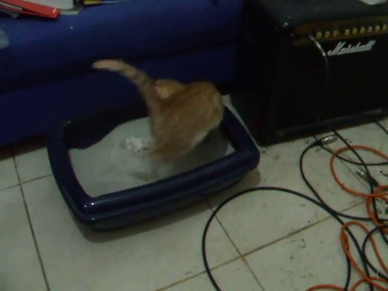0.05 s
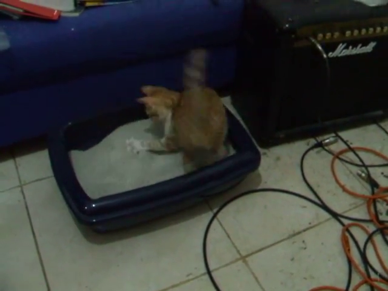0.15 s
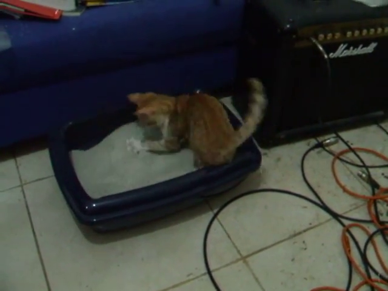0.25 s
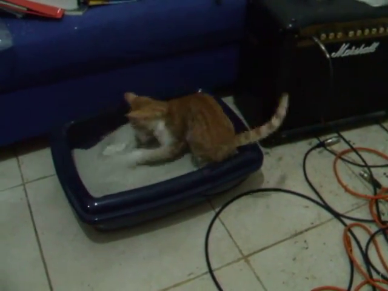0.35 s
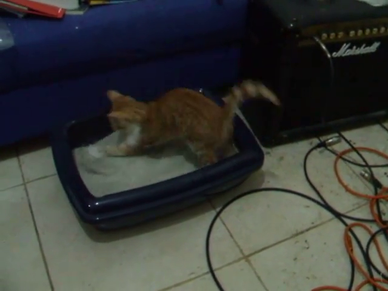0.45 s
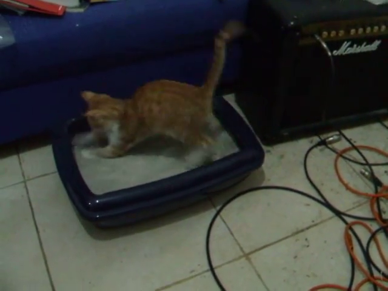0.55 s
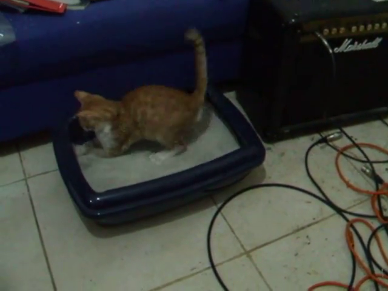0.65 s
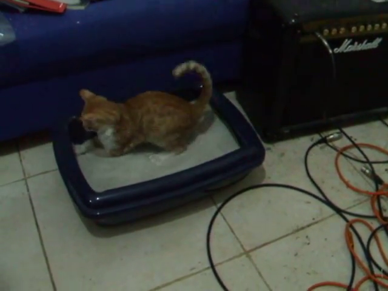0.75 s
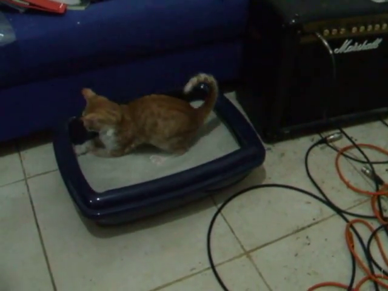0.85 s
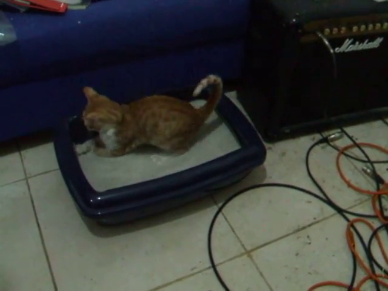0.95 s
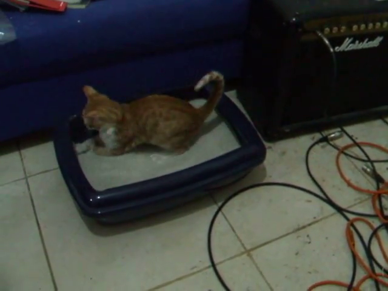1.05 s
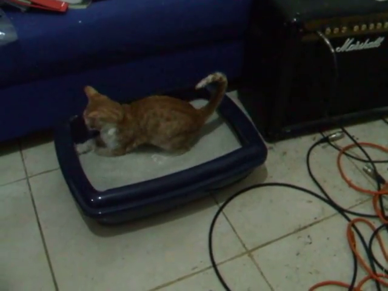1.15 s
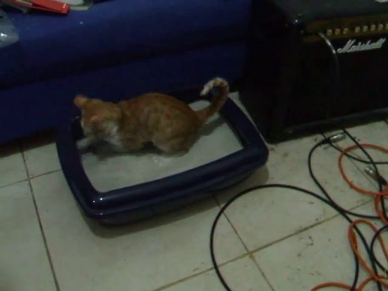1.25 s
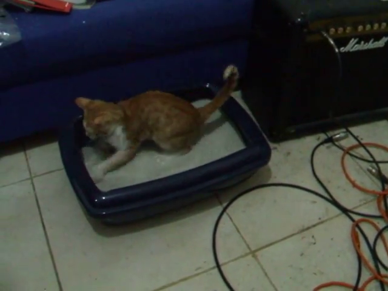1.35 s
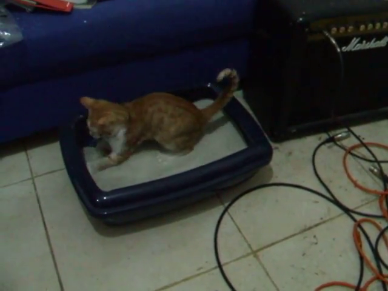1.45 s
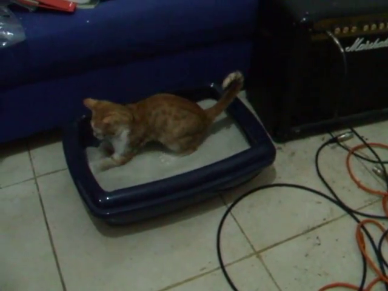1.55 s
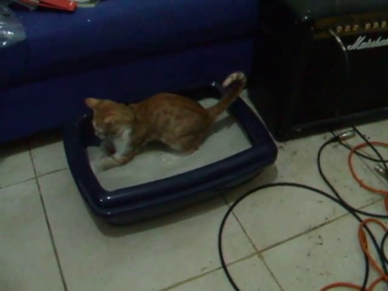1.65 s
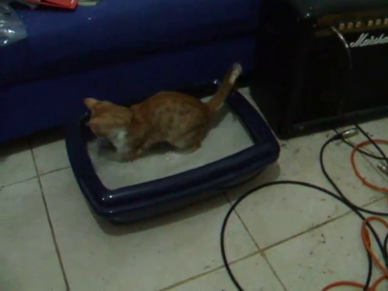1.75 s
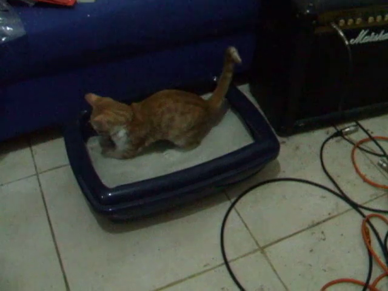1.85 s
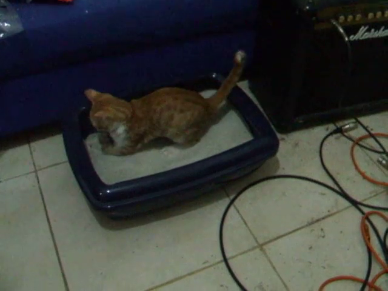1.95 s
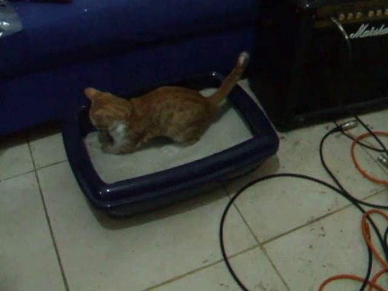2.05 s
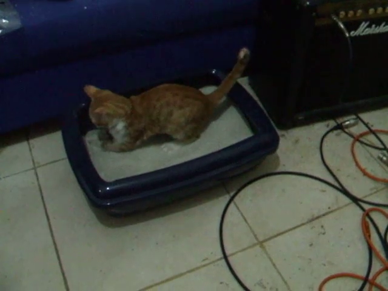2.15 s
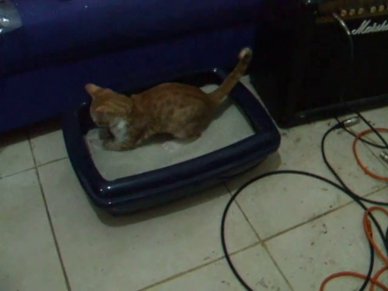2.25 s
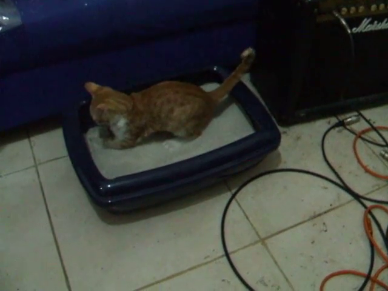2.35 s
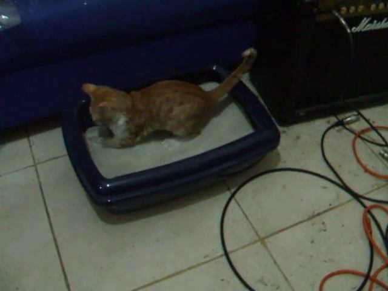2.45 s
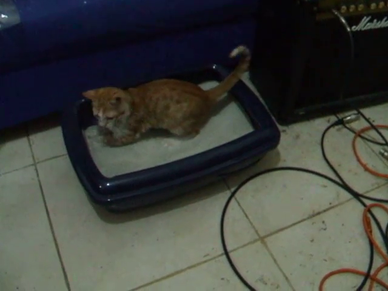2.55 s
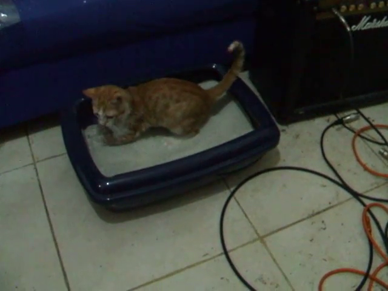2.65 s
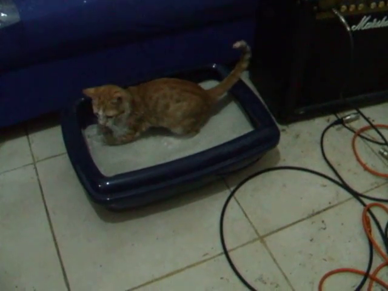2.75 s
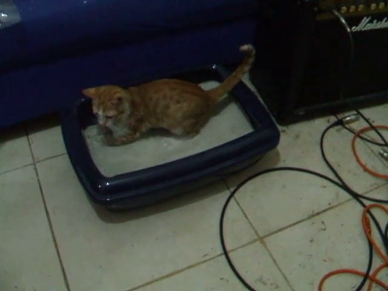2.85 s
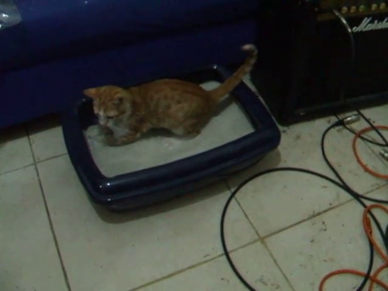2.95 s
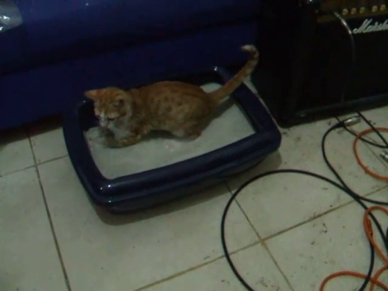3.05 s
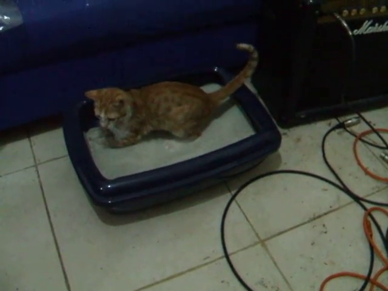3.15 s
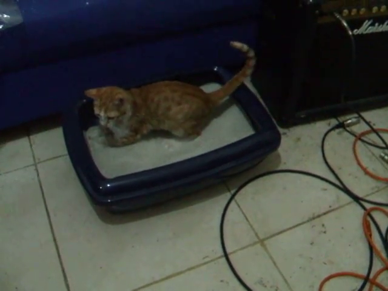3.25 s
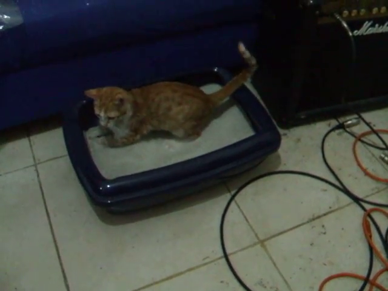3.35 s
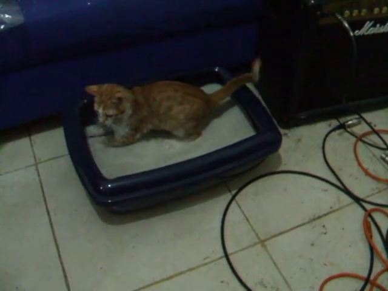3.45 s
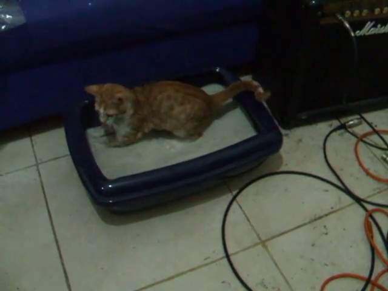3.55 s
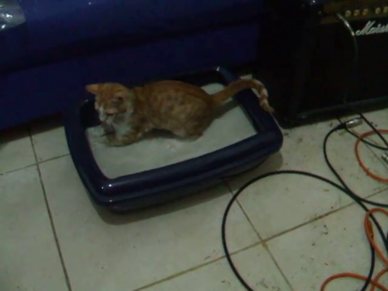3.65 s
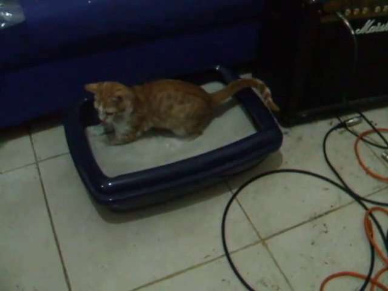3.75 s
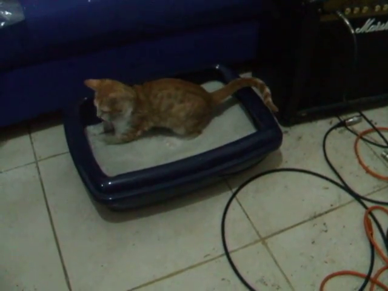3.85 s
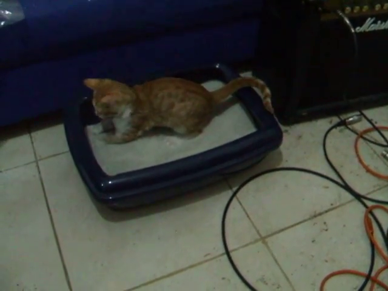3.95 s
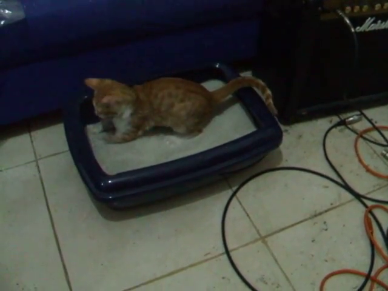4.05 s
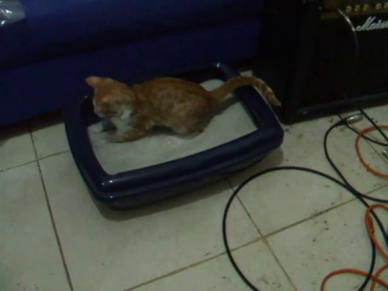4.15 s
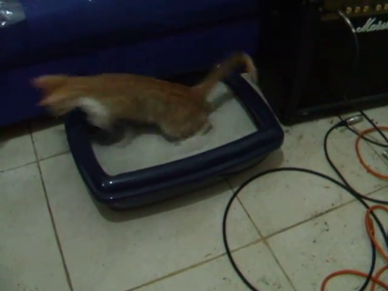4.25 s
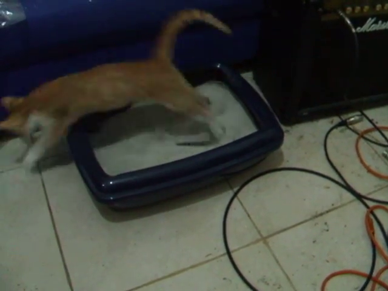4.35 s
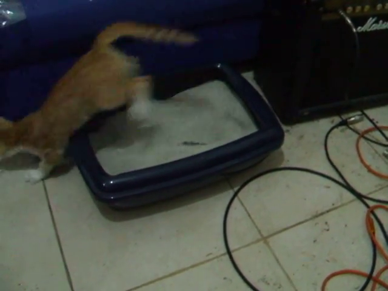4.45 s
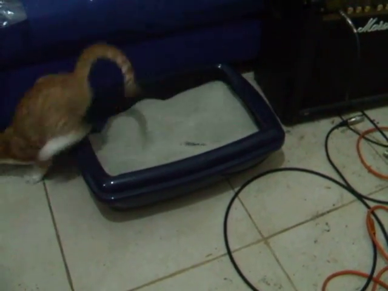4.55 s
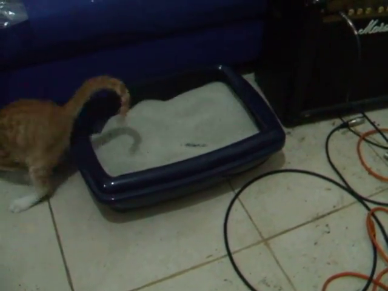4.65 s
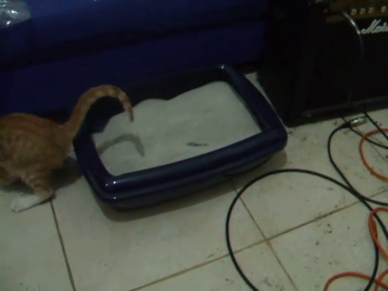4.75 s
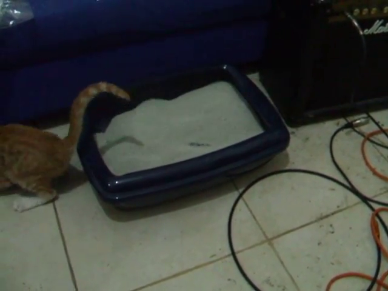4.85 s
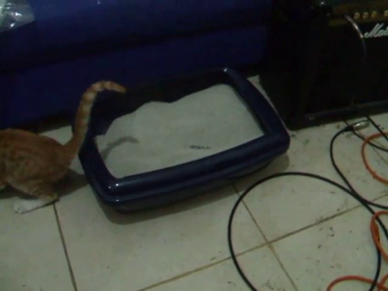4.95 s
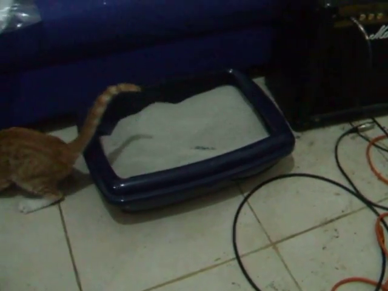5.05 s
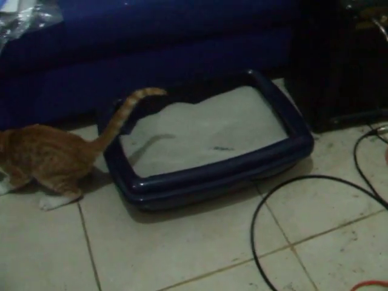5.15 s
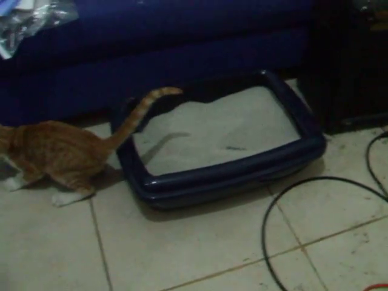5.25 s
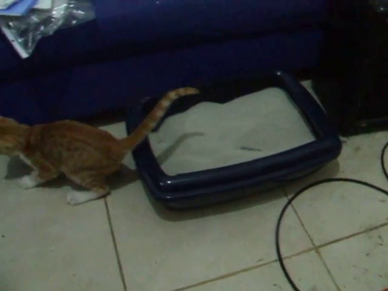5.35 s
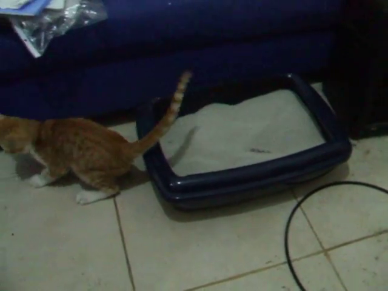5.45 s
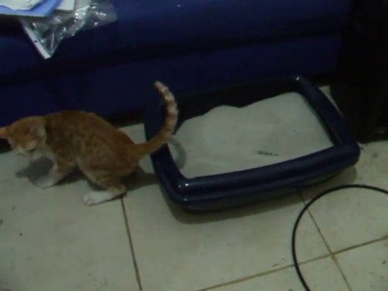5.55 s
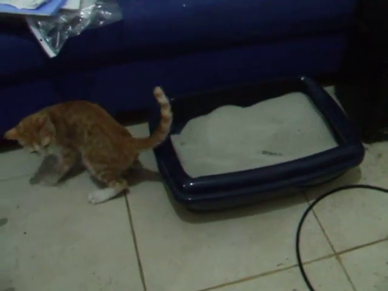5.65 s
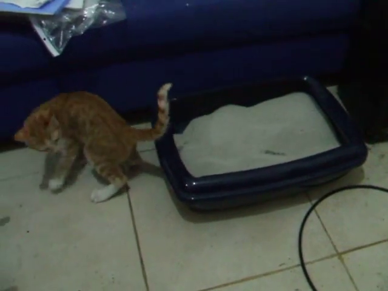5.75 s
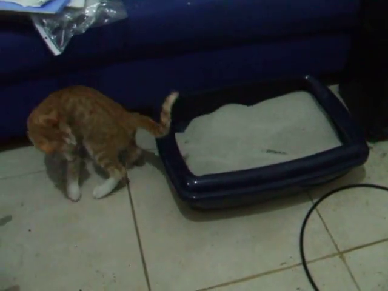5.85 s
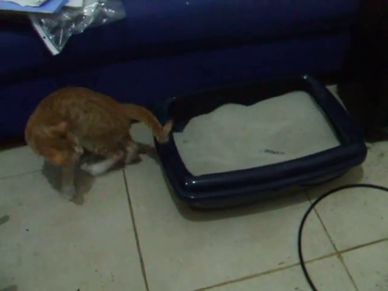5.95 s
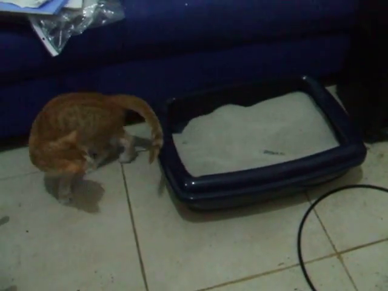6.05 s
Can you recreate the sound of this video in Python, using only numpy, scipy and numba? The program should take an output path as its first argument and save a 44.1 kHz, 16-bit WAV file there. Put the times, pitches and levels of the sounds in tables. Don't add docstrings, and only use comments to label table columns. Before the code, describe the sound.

A small tiled room has steady soft hiss, a faint wavering low hum and a very thin high camera whine throughout. From 0 s a kitten's paws rake dry granular litter in a plastic tray: quick, overlapping gritty swishes, with grains ticking on the walls and light knocks at 0.2 and 0.36 s. A hard hollow plastic blow lands at 0.56 s, another knock at 0.64 s, and scratching fades by about 0.9 s. At 1.2 to 1.5 s a second burst scrapes and thuds; at 1.75 s a heavy, sharp rim knock comes with a short scrape. From 1.9 to 3.5 s there are only faint litter shuffles, then near quiet. At 4.16 to 4.4 s brisk scrapes mark the jump out, followed at 4.6 s by a soft dull paw thud on tile and a few scattered grain ticks. Only room hiss and hum remain until about 6 s.

```python
import sys
import numpy as np
from scipy import signal
from scipy.fft import rfft, irfft, next_fast_len
from scipy.io import wavfile
from scipy.ndimage import uniform_filter1d
from numba import njit

SR = 44100
rng = np.random.default_rng(int(sys.argv[2]) if len(sys.argv) > 2 else 0)


def attenuation_scalar(level_db):
    decades = np.asarray(level_db, float) / 20
    return 10 ** decades


def transcribe(u):
    v = np.clip(np.atleast_2d(u).T, -1, 1)
    q = np.round(v * 32767).astype(np.int16)
    wavfile.write(sys.argv[1], SR, q)


N = 268740

# (frequency [Hz], density [dB per Hz])
ROOM_TONE = [(21, -21), (35, -4.5), (59, -5.5), (76, -13.5), (113, -6), (145, -12), (195, -3.5),
             (324, -3.5), (347, -6.5), (588, -6), (908, -10), (996, -9), (4630, -17.5), (7840, -13.5),
             (8400, -23.5), (10900, -80), (18500, -120)]
# (frequency [Hz], width [Hz], level [dB])
ROOM_MODES = [(118.27, 11, -74), (573, 9.1, -70), (688.3, 9.5, -69)]
# (frequency [Hz], level [dB])
WHINE = [(7822, -78), (7854, -69), (7881, -70), (7913, -79), (8086, -82), (8118, -73), (8150, -74)]
# (landing time [s], push [s], peak level [dB], settling per 20 dB [s], dig depth [dB])
STROKES = [(0.0, 0.099, -38.5, 0.1239, -3.5), (0.194, 0.0254, -33.5, 0.1508, -3),
           (0.345, .035, -40.5, 0.1382, -5.5), (0.438, .008, -39.5, 0.0843, -8.5),
           (0.465, 0.0184, -40.5, 0.1415, -1), (0.505, .045, -37.5, 0.071, -16),
           (0.562, .012, -33, 0.1177, 1), (0.64, 0.0411, -34.5, 0.1109, -3), (0.759, .012, -44, 0.1832, 0),
           (1.193, 0.0658, -36, 0.12, -12.5), (1.265, 0.024, -39, 0.0627, -11),
           (1.322, .006, -35.5, 0.08, -8.5), (1.388, 0.0325, -35, 0.099, -7.5), (1.46, .045, -44, .11, -25),
           (1.54, .05, -54, .15, -20), (1.695, 0.048, -43, 0.13, -9), (1.7525, .003, -28, .04, -20),
           (1.765, 0.0177, -33, 0.0961, -8), (4.157, .063, -34, .14, -8), (4.258, 0.047, -34, .08, -10),
           (4.313, .027, -34.5, .16, -2)]
# (landing time [s], push [s], peak level [dB], settling per 20 dB [s], dig depth [dB])
SHUFFLES = [(1.92, .03, -57, .05, -20), (2.13, .025, -60, .05, -10), (2.525, .03, -48, .08, -15),
            (2.565, .027, -51, .03, -15), (3.36, 0.054, -53.5, 0.01, -11.5),
            (3.41, 0.0315, -48, 0.0845, -30.5), (3.475, 0.022, -52, 0.0844, -21.5),
            (4.53, .025, -53.5, 0.2042, -11.5), (4.598, 0.0207, -51, 0.13, -8),
            (4.655, .015, -51, .08, -11), (4.712, .018, -55, 0.13, -13.5)]
# (frequency [Hz], density [dB per Hz])
LITTER = [(260, -41), (450, -24.5), (496, -13.5), (950, -3), (1390, -2.5), (2160, -2), (2660, -1.5),
          (3150, 1), (7340, -5.5), (8400, -23.5), (10900, -31.5), (18500, -120)]
# (time [s], ring of the edge [dB])
EDGE = [(.1, 1), (.3, -2), (.4, -1), (.45, -8), (.57, -2), (.8, -3), (1.2, -9), (1.33, -9), (1.5, -18.5),
        (1.74, -4), (1.758, 2), (1.8, -10), (3.5, -9.5), (4.25, -7), (4.285, 1), (4.33, -2), (4.55, -11)]
# (frequency [Hz], width [Hz], level [dB])
RIM = [(2220, 40, -25), (2420, 67, -15), (3250, 360, -17.5), (4292, 240, -4), (5080, 100, -4),
       (7710, 670, 0)]
# (time [s], hold [s], rattle level [dB], boom level [dB])
LEANS = [(0.042, 0.083, -53, -63.5), (0.194, .055, -42, -59.5), (0.364, .02, -47.5, -55),
         (0.565, 0.036, -41, -57), (0.634, .062, -42.5, -55), (1.324, 0.0135, -45.5, -55),
         (1.393, 0.0454, -49.5, -62), (1.762, .03, -36.5, -58), (1.812, .026, -49, -58),
         (4.189, 0.059, -55, -67.5), (4.332, 0.0464, -52, -66.5), (4.611, .015, -54, -54)]
# (time [s], crack level [dB], thud level [dB], wall level [dB], loudest wall pitch [Hz])
KNOCKS = [
    (0.2011, -30.5, -30.5, -29, 662),
    (0.3645, -28.5, -37.5, -37, 805),
    (0.561, -7.5, -22, -12.5, 646),
    (0.6386, -23.5, -34, -26, 829),
    (1.3248, -24, -25, -47.5, 824),
    (1.4163, -24, -38, -29, 877),
    (1.7508, -9, -16.5, -18.5, 955),
    (4.615, -43, -32, -66.5, 573),
]
# (frequency [Hz], width [Hz])
WALL = [(505, 54), (640, 31.9), (795, 73), (970, 45), (1250, 120)]
# (time [s], peak level [dB], pitch [Hz])
TICKS = [(4.6003, -32, 2100), (0.328, -31.5, 3080), (0.4142, -29, 2800), (0.4405, -21, 3400),
         (0.455, -30.5, 5250), (0.63, -25.5, 4910), (0.7627, -28, 2200), (1.253, -32, 2750),
         (1.2903, -27.5, 3450), (1.3927, -24.5, 4770), (1.504, -36.5, 3250), (1.933, -36.5, 4640),
         (1.9512, -36.5, 4000), (4.1654, -29, 3490), (4.476, -39, 4690), (4.538, -41.5, 3650),
         (4.6004, -31, 6000), (4.6185, -28.5, 5260), (4.6703, -43.5, 2930), (4.7217, -35.5, 4160)]


def set_rms(x, db):
    return x * attenuation_scalar(db) / np.sqrt(np.mean(x ** 2))


def on_log(hz, table):
    table_hz, db = np.transpose(table)
    return np.interp(np.log(hz), np.log(table_hz), db)


def band(x, hz, width):
    return signal.lfilter(*signal.iirpeak(hz, hz / width, SR), x)


def driven_mode(noise, hz, width, second_width, db):
    return set_rms(band(band(noise, hz, width), hz, second_width), db)


def walk(rate):
    hold = int(SR / rate)
    steps = np.repeat(rng.standard_normal(N // hold + 1), hold)
    return 0.945 * uniform_filter1d(steps, hold)[:N]


@njit
def rings(start, hz, turns, size, turn_rad):
    y = np.zeros(N)
    for k in range(len(start)):
        w = 2 * np.pi * hz[k] / SR
        step = np.exp(complex(-hz[k] / SR / turns[k], w))
        z = size[k] * np.exp(complex(0., turn_rad[k]))
        stop = min(N, start[k] + int(5 * turns[k] * SR / hz[k]))
        for i in range(start[k], stop):
            y[i] += z.imag
            z *= step
    return y


def background():
    n = next_fast_len(N)
    t = np.arange(N) / SR
    hz = np.maximum(np.arange(n // 2 + 1) * SR / n, 1)
    hiss = irfft(rfft(rng.standard_normal(n)) * attenuation_scalar(on_log(hz, ROOM_TONE)), n)[:N]
    out = set_rms(hiss, -51.5) * attenuation_scalar(0.7854 * walk(4.99))
    for mode_hz, width, db in ROOM_MODES:
        mode = driven_mode(rng.standard_normal(N), mode_hz, width, width, db)
        out = out + mode * attenuation_scalar(-0.5 * walk(2.49))
    beat_db = 4 * np.cos(2 * np.pi * (t - 0.41) / .69)
    swell_db = 2.5 * np.cos(2 * np.pi * (t - 1.83) / 2.05)
    hum_hz = 49 + 3.4 * walk(6)
    hum = np.sqrt(2) * np.sin(2 * np.pi * np.cumsum(hum_hz) / SR)
    drone = driven_mode(rng.standard_normal(N), 200, 40, 60, 0)
    return out + hum * attenuation_scalar(-67.5 + beat_db + swell_db) + drone * attenuation_scalar(-63 + 1.5 * walk(2.95))


def paws(at):
    push_curve, sink_db = 0.604, -8.5
    dust_db, dust_per_depth, dust_late_db, dust_lingers = -6, -0.136, -3, 1.12
    load_db, load_per_depth = -15.5, .4
    t = at[::16]
    power = np.full((4, len(t)), 1e-18)
    for s, push_s, db, settle_s, depth_db in STROKES + SHUFFLES:
        pushed = np.clip((t - s) / push_s, 0, 1)
        fall_db = -20 * np.maximum(t - s - push_s, 0) / settle_s
        deep = depth_db + sink_db * (1 - pushed)
        dust = dust_db + dust_per_depth * depth_db + dust_late_db * (1 - pushed)
        dust = dust + fall_db * (1 / dust_lingers - 1)
        load = load_db + load_per_depth * deep
        parts_db = np.array([0 * t, deep, dust, load])
        power += (pushed ** push_curve * attenuation_scalar(db + fall_db + parts_db)) ** 2
    slide, *parts = 10 * np.log10(power)
    curves = [slide] + [part - slide for part in parts]
    return *(np.interp(at, t, c) for c in curves), np.interp(at, *np.transpose(EDGE))


def litter():
    count, turns = 200000, 4.39
    at, pick, odd, sign = rng.random((count, 4)).T
    i = (at * N).astype(np.int64)
    hz = 450 * (8500 / 450) ** pick
    odd_db = np.minimum(-2.9 * np.log(1 - odd), 13)
    clump_db = 1.3 * walk(250)[i] + 0.6 * walk(70)[i]
    size = attenuation_scalar(on_log(hz, LITTER) + 10 * np.log10(hz * hz) + odd_db + clump_db)
    core = (hz > 1500) & (hz < 5000)
    energy = size ** 2 * turns * SR / hz / 4
    size = size / np.sqrt(np.sum(energy[core]) / N)

    db, deep, dust, load, edge_db = paws(np.arange(N) / SR)
    moving = db > -75
    low = np.clip(np.log(1700 / hz) / np.log(1.5), 0, 1)
    high = np.clip(np.log(hz / 4500) / np.log(1.4), 0, 1)
    size = size * attenuation_scalar(db[i] + low * (deep[i] + 6) + high * (dust[i] + 6))
    on = moving[i]
    grains = rings(i[on], hz[on], np.full(on.sum(), turns), size[on], np.pi * (sign[on] > .5))
    grains = signal.sosfilt(signal.butter(2, 450, "high", fs=SR, output="sos"), grains)

    shove = rng.standard_normal(N) * attenuation_scalar(2 * walk(60))
    floor = driven_mode(shove, 300, 80, 160, 0)
    floor = floor * uniform_filter1d(moving * attenuation_scalar(db + load), SR // 100)
    rim = sum(attenuation_scalar(d) * band(grains, f, w) for f, w, d in RIM[1:])
    edge = attenuation_scalar(2.55 * np.clip(edge_db + 2.66, -12, 4)) * band(grains, 2191, 300)
    return grains + floor + attenuation_scalar(-3) * (rim + edge)


def room(x):
    t60_s, wet_db, rise_s = 0.222, -15.5, 0.0081
    t = np.arange(SR // 2) / SR
    tail = rng.standard_normal(len(t)) * attenuation_scalar(-60 * t / t60_s) * np.clip(t / rise_s, 0, 1)
    tail = signal.lfilter(*signal.butter(1, [400, 6000], "band", fs=SR), tail)
    tail = tail / np.sqrt(np.sum(tail ** 2))
    return x + attenuation_scalar(wet_db) * signal.fftconvolve(x, tail)[:N]


def leans():
    release_s = .03
    t = np.arange(N) / SR
    gain = np.zeros((2, N))
    for s, hold_s, db, boom_db in LEANS:
        press = np.clip((t - s) / .003, 0, 1)
        release = attenuation_scalar(-20 * np.maximum(t - s - hold_s, 0) / release_s)
        gain += press * release * attenuation_scalar([[db], [boom_db]])
    shake = rng.standard_normal(N) * attenuation_scalar(2.5 * walk(70))
    rattle = driven_mode(shake, 295, 150, 300, 0)
    boom = driven_mode(shake, 90.3, 54, 108, 0)
    return gain[0] * rattle + gain[1] * boom


def knocks():
    thud_hz, wall_fall_db = 302.5, 7.0
    bounce_s, bounce_db, spray_s, spray_db = 0.008059, -5, 0.011, -12
    out = np.zeros(N)
    t = np.arange(SR // 4) / SR
    blow = np.exp(-((t - .0006) / 0.000237) ** 2)
    blow = blow + attenuation_scalar(bounce_db) * np.exp(-((t - bounce_s - .0006) / 0.000237) ** 2)
    floor = band(blow, thud_hz, 40) - .6 * band(blow, .74 * thud_hz, 50) - .4 * band(blow, 1.25 * thud_hz, 60)
    thud = floor + 0.12 * band(band(blow, 130, 110), 150, 140)
    snap = (t / .0015) * np.exp(1 - t / .0015)
    spray = attenuation_scalar(spray_db) * np.exp(-t / spray_s)
    for s, crack_db, thud_db, wall_db, wall_hz in KNOCKS:
        wall = np.zeros(len(t))
        for k, (hz, width) in enumerate(WALL):
            mode_db = -wall_fall_db * abs(np.log2(hz / wall_hz))
            wall += (-1) ** k * attenuation_scalar(mode_db) * band(blow, hz, width)
        burst = rng.standard_normal(len(t)) * (snap + spray)
        crack = band(burst, 2170, 250) + .8 * band(burst, 4500, 1200)
        crack = crack + .6 * band(band(burst, 3000, 4500), 3000, 6000)
        parts = ((thud, thud_db - 5.5), (wall, wall_db - 6), (crack, crack_db - 4.5))
        i = int(s * SR)
        out[i:i + len(t)] += sum(attenuation_scalar(db) * x / np.abs(x).max() for x, db in parts)
    return out


def ticks():
    count, turns, scatter_s, scatter_oct = 12, 2.77, .001, 0.65
    s, db, hz = (np.repeat(column, count) for column in np.transpose(TICKS))
    late, pitch, sign = rng.random((len(s), 3)).T
    i = ((s - scatter_s * np.log(1 - late)) * SR).astype(np.int64)
    hz = np.minimum(hz * 2 ** (scatter_oct * (2 * pitch - 1)), 8000.)
    return rings(i, hz, np.full(len(s), turns), attenuation_scalar(db - 10), np.pi * (sign > .5))


def scene():
    tray = litter() + knocks() + ticks()
    return (room(tray) + background() + leans())[None]


def top_cut(x):
    return signal.sosfilt(signal.butter(12, 9080, fs=SR, output="sos"), x)


def record(dry):
    t = np.arange(N) / SR
    soft_top = signal.sosfilt(signal.butter(8, 8300, fs=SR, output="sos"), dry)
    steep_top = signal.sosfilt(signal.ellip(10, .3, 85, 8800, fs=SR, output="sos"), soft_top)
    whine = sum(np.sqrt(2) * attenuation_scalar(db) * np.sin(2 * np.pi * (hz * t + rng.random())) for hz, db in WHINE)
    offset = -.0024
    return top_cut(steep_top + whine + offset)


dry = scene()
out = record(dry)
transcribe(out)
```